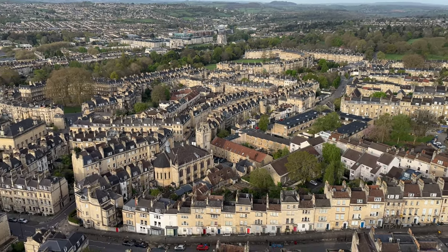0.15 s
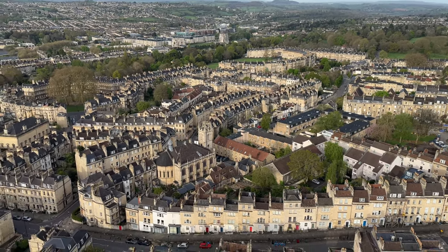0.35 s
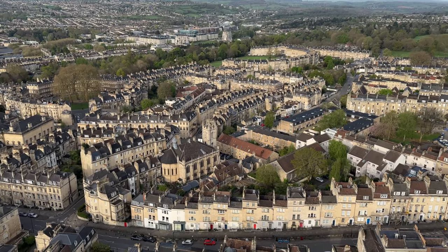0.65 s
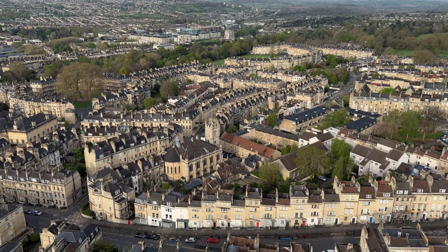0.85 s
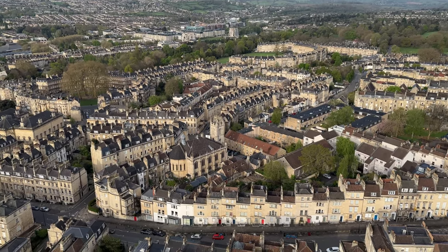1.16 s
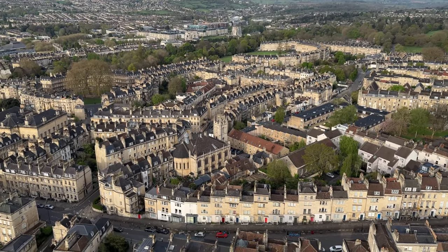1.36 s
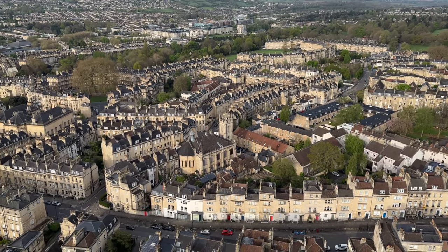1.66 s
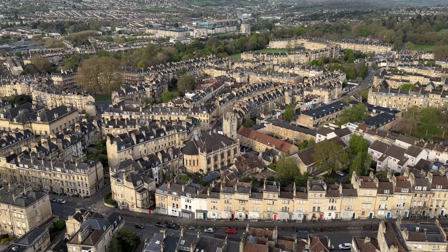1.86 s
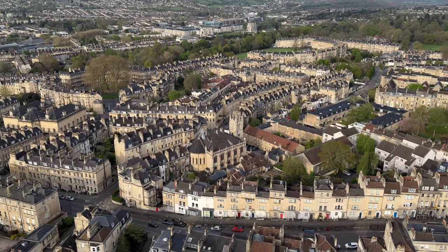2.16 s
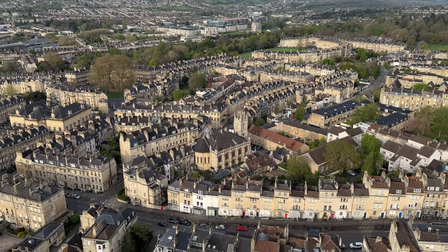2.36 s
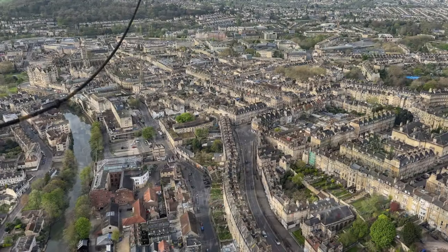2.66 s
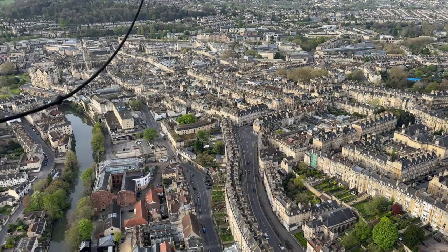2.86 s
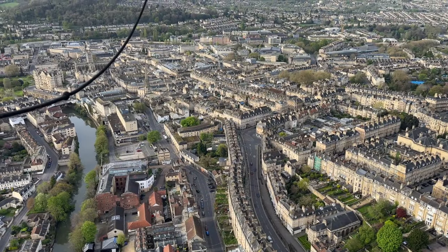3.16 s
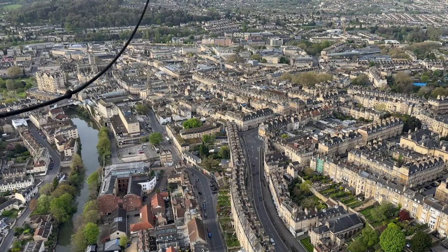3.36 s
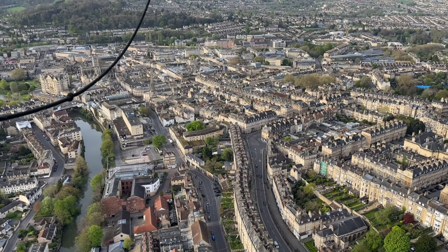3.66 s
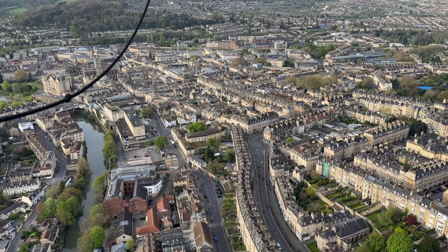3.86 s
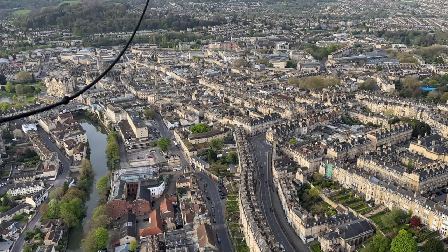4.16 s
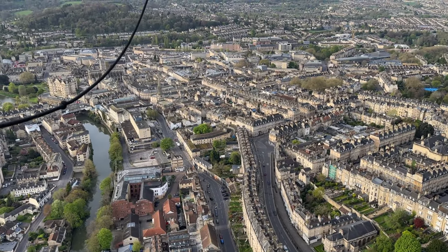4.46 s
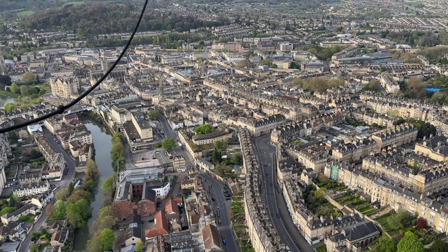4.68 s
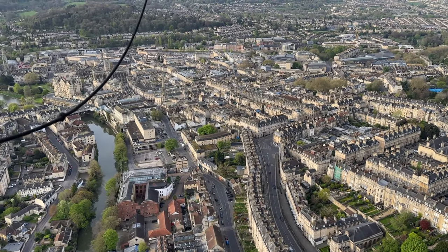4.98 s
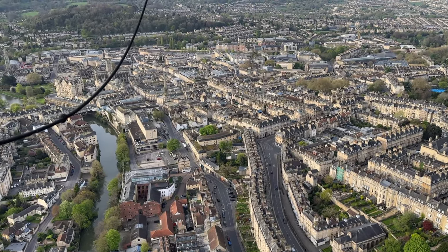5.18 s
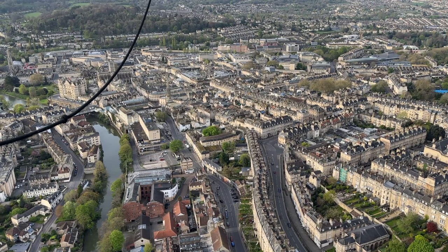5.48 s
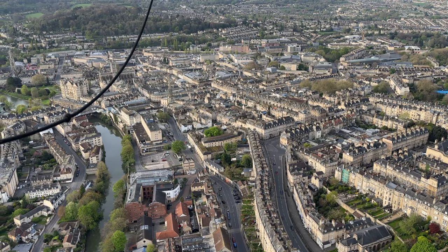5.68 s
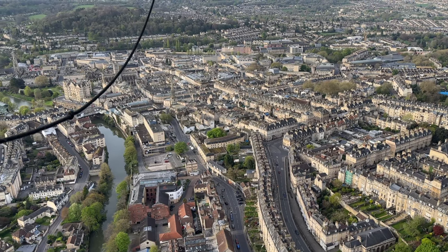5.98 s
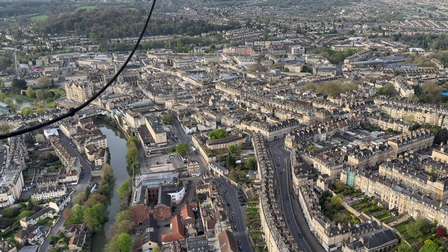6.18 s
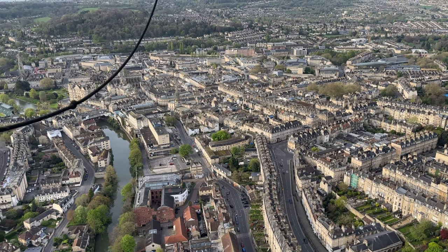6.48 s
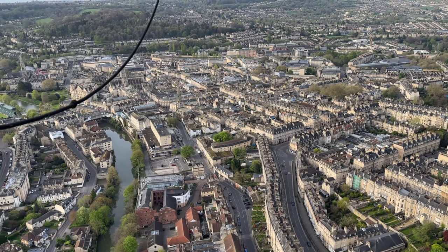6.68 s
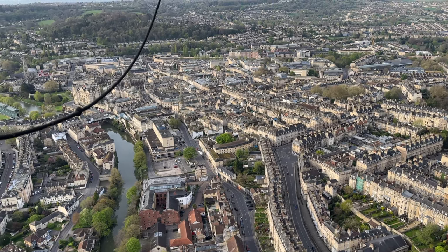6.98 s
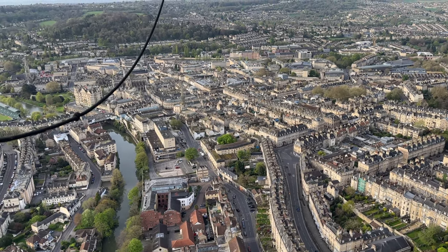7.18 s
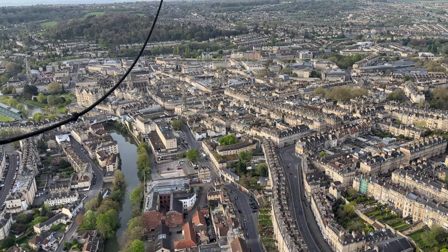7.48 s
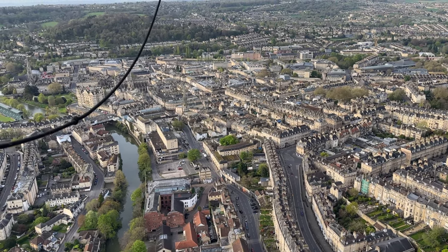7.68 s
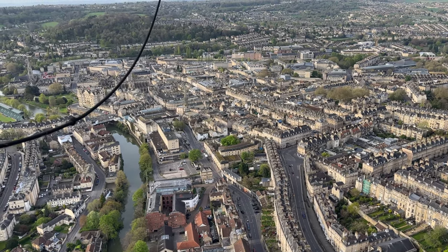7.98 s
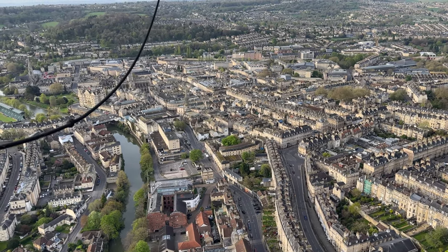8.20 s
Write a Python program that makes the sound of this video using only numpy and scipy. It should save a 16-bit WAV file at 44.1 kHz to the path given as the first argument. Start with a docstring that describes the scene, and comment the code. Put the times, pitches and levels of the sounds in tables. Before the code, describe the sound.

A loud gas flame rumbles and hisses just above the microphone, wide in stereo and completely dry. One long blast overlaps into another that begins with extra pressure and brighter jets, then eases slightly. After several seconds it collapses suddenly as the valve closes, its deepest rumble going last. Remaining gas whistles away with a bright ping. In the quiet are a distant wavering engine, faint falling birdlike chirps, dull traffic and a crackly creak of the basket.

```python
"""A rumbling, roaring gas flame and hissing jets: one long blast gives way to a second, brighter one.
The propane burner of a hot air balloon fires above the basket: filtered noise, with narrow resonances for the jets.
The valve shuts and the last gas bleeds away as fading noise, with short pings and ticks of decaying sines.
Left are a faint pilot hiss, a brief wicker creak of short noise slips, a few falling sine chirps,
and the far town: dull noise and one wavering engine tone."""
import sys
import numpy as np
from scipy import signal
from scipy.fft import rfft, irfft, next_fast_len
from scipy.io import wavfile
from scipy.ndimage import uniform_filter1d

SR = 44100
rng = np.random.default_rng(int(sys.argv[2]) if len(sys.argv) > 2 else 0)


def pcm_store(signal):
    """Save signal as 16-bit PCM."""
    levels = np.round(np.clip(np.atleast_2d(signal), -1, 1) * 32767)
    wavfile.write(sys.argv[1], SR, levels.astype(np.int16).T)


N = 367794
T = np.arange(N) / SR                                      # time [s]
HZ = np.maximum(np.arange(N // 2 + 1) * SR / N, 1)         # frequency of each spectral bin [Hz]


def from_db(db):
    """Decibels to gain."""
    return 10 ** (np.asarray(db) / 20)


def in_time(rows):
    """The columns of a time curve, interpolated at every sample."""
    s, *columns = np.transpose(rows)
    return [np.interp(T, s, column) for column in columns]


def in_frequency(rows):
    """The columns of a spectrum, interpolated over log frequency."""
    hz, *columns = np.transpose(rows)
    return [np.interp(np.log(HZ), np.log(hz), column) for column in columns]


def white():
    """The spectrum of a fresh white noise."""
    return rng.standard_normal(len(HZ)) + 1j * rng.standard_normal(len(HZ))


def below(edge_hz, order):
    """Gain of a low-pass."""
    return 1 / np.sqrt(1 + (HZ / edge_hz) ** (2 * order))


def above(edge_hz, order):
    """Gain of a high-pass."""
    return 1 / np.sqrt(1 + (edge_hz / HZ) ** (2 * order))


def sound(spectrum):
    """A stereo spectrum as a wave whose left-right mean has rms 1."""
    x = irfft(spectrum, N)
    return x / np.std(x.mean(axis=0))


def drift(rate_hz):
    """Low-passed random curve with spread 1, drawn at every tenth sample."""
    size = next_fast_len(N // 10 + 2)
    hz = np.arange(size // 2 + 1) * SR / 10 / size
    spectrum = rfft(rng.standard_normal(size)) / np.sqrt(1 + (hz / rate_hz) ** 4)
    x = irfft(spectrum, size)
    return np.interp(np.arange(N) / 10, np.arange(size), x / np.std(x))


def ear_noise(likeness):
    """Spectra of two white noises that are partly the same: likeness 0 is independent, 1 is identical."""
    alike = np.clip(likeness, 0, 1)
    common = np.sqrt((1 + alike) / 2) * white()
    opposed = np.sqrt((1 - alike) / 2) * white() * [[1], [-1]]
    return common + opposed


def at_ears(left_db, right_db, lead_rad):
    """Gain and phase on the way to each ear; the left leads."""
    return np.vstack([from_db(left_db) * np.exp(1j * lead_rad), from_db(right_db)])


def rush(colour, likeness):
    """Steady stereo noise of a given colour."""
    return sound(ear_noise(likeness) * from_db(in_frequency(colour)[0]))


def dying(start_s, db_per_s):
    """Level drop in dB from a given moment on."""
    return -db_per_s * np.maximum(T - start_s, 0)


def evened(x, window_s):
    """A noise with its slow swings of level taken out."""
    power = uniform_filter1d(x.mean(axis=0) ** 2, int(window_s * SR))
    return x / np.sqrt(power + 1e-12)


def hollow(x, hollows):
    """Narrow bands of the sound are weakened; a positive depth lifts the band instead."""
    change_db = 0
    for hz, half_width_hz, depth_db in hollows:
        change_db = change_db + depth_db * np.exp(-((HZ - hz) / half_width_hz) ** 4)
    return irfft(rfft(x) * from_db(change_db), N)


def town(traffic_db, octave_db, left_db):
    """Traffic murmurs far below as dull noise; one engine stands out, a wavering tone with its octave."""
    # murmur of traffic: (frequency [Hz], relative level [dB per Hz])
    traffic_colour = [(15, -49), (25, -35), (48, -2), (86, -6), (123, -10.5), (155, -10.5), (258, -14.5),
                      (439, -20.5), (1510, -24), (1710, -28), (2070, -31.5), (2450, -36), (2730, -34.5),
                      (4000, -52), (5200, -77), (8800, -120)]
    # far engine: (time [s], pitch [Hz], level [dB])
    engine_curve = [(7.0, 114, -47), (7.3, 114.4, -38.5), (7.45, 119.3, -50.5), (7.8, 124.7, -44),
                    (8.05, 121.8, -51.5), (8.34, 130.7, -49)]
    traffic = from_db(traffic_db) * rush(traffic_colour, likeness=0.78 * below(390, order=1))
    pitch_hz, engine_db = in_time(engine_curve)
    phase = 2 * np.pi * np.cumsum(pitch_hz * (1 + 0.0251 * drift(10))) / SR
    tone = np.sin(phase) + from_db(octave_db) * np.sin(2 * phase)
    engine = np.sqrt(2) * from_db(engine_db + 1.7 * drift(7.7)) * tone
    return (traffic + engine) * from_db([[left_db], [-left_db]])


def chirps(top_hz, bottom_hz, fall_s, length_s, rough, blur_hz):
    """Faint falling chirps, like a bird far below: sines gliding down, blurred in pitch by the distance."""
    # chirps: (time [s], level [dB])
    calls = [(7.16, -75), (7.31, -76.5), (7.375, -74), (7.46, -73), (7.625, -73.5)]
    wobble_cycles = np.cumsum(blur_hz * drift(250)) / SR
    out = 0
    for s, db in calls:
        age_s = np.clip(T - s, 0, length_s)
        swell = np.sin(np.pi * age_s / length_s)
        glide_cycles = bottom_hz * age_s - (top_hz - bottom_hz) * fall_s * np.exp(-age_s / fall_s)
        out = out + from_db(db) * swell * np.sin(2 * np.pi * (glide_cycles + wobble_cycles))
    return out * (1 + rough * drift(110))


def rustles(grain_db, split_hz):
    """The wicker creaks: each slip is a dull knock with a bright snap of noise, over a faint rubbing."""
    # slips and ticks in the basket: (time [s], dull knock [dB], bright snap [dB])
    slip_events = [(7.681, -63, -61), (7.6955, -60, -52), (7.701, -45, -56), (7.707, -52, -63),
                   (7.721, -54, -56), (7.7315, -58, -55), (7.738, -49, -58), (7.750, -56, -55),
                   (7.761, -51, -64), (8.034, -58, -55)]
    # colour of the wicker: (frequency [Hz], relative level [dB per Hz])
    wicker_colour = [(400, -5), (1900, 9), (2400, 6), (3200, -3), (4500, -4), (6200, 1), (8000, -7),
                     (10000, -9), (15000, -15)]
    slip_decay_s = 0.0019
    rub_middle_s, rub_half_length_s, rub_db = 7.728, 0.04, -63
    wicker = rfft(rush(wicker_colour, likeness=.4))
    dull = sound(wicker * below(split_hz, order=4))
    bright = sound(wicker * above(split_hz, order=4))
    slips = 0
    for s, knock_db, snap_db in slip_events:
        decay = (T >= s) * np.exp(-np.abs(T - s) / slip_decay_s)
        slips = slips + decay * (from_db(knock_db) * dull + from_db(snap_db) * bright)
    rub_swell = np.exp(-((T - rub_middle_s) / rub_half_length_s) ** 4)
    rubbing = from_db(rub_db + grain_db * drift(400)) * rub_swell
    return slips + rubbing * sound(wicker)


def pings_and_knocks():
    """Pings, knocks and ticks: short decaying sines; those at 7.70 s give the creak's knock its body."""
    # sines: (time [s], frequency [Hz], level at onset [dB], time to fall 60 dB [s])
    strikes = [(7.06, 5760, -49, .06), (7.25, 4950, -62, .06), (7.252, 4600, -63, .06),
               (7.7005, 1200, -43, .018), (7.701, 2380, -47, .028), (8.034, 5600, -61, .025)]
    out = 0
    for s, hz, db, t60_s in strikes:
        out = out + (T >= s) * from_db(db + dying(s, 60 / t60_s)) * np.sin(2 * np.pi * hz * (T - s))
    return out


def nozzle_ring(hz, half_width_hz, level_db):
    """The last gas makes a nozzle sing in a narrow band of noise, swelling and then tapering away."""
    peak_s, swell_db_per_s, taper_db_per_s = 7.085, 90, 245
    tone = sound(ear_noise(.3) / (1 + ((HZ - hz) / half_width_hz) ** 2))
    swell_db = swell_db_per_s * np.minimum(T - peak_s, 0)
    return tone * from_db(level_db + swell_db + dying(peak_s, taper_db_per_s))


def idle_burner(pilot_db):
    """The coil empties in a short puff, then a faint trickle; the pilot flame stays lit."""
    # colour of the bleeding gas: (frequency [Hz], relative level [dB per Hz])
    bleed_colour = [(2000, -6.5), (3650, -19), (4050, -5), (4250, -8), (4440, 0), (4700, -10), (4950, -3),
                    (5200, -17), (6600, -9), (7500, -19), (9000, -18), (12000, -33)]
    # singing nozzles: (frequency [Hz], half width [Hz], level [dB])
    rings = [(4415, 62, -58), (4950, 60, -63.5)]
    # faint hiss of the pilot flame: (frequency [Hz], relative level [dB per Hz])
    pilot_colour = [(2500, 0), (4000, -3), (5900, -5), (6300, 3), (6550, -1), (6850, 1), (7600, -21),
                    (8800, -1), (10500, -18), (13000, -12), (14400, -8), (15700, -16)]
    bleed_starts_s, bleed_attack_s = 6.92, 0.035
    puff = from_db(-53 + dying(7.06, db_per_s=220))
    trickle = from_db(-83 + dying(7.6, db_per_s=100))
    gas = (puff + trickle) * rush(bleed_colour, likeness=.3)
    gas = gas + sum(nozzle_ring(*ring) for ring in rings)
    bleed = np.clip((T - bleed_starts_s) / bleed_attack_s, 0, 1) * gas
    return bleed + from_db(pilot_db) * rush(pilot_colour, likeness=.15)


def flame(colour, split_hz, top_hz, echo_s, echo_db):
    """Turbulent burning: large eddies rumble, small ones roar; a dull reflection ripples the bass."""
    left_db, right_db, likeness, lead_rad = in_frequency(colour)
    burning = ear_noise(likeness) * at_ears(left_db, right_db, lead_rad)
    burning = burning * above(18, order=3) * below(top_hz, order=12)
    delay = np.exp(-2j * np.pi * HZ * echo_s)
    burning = burning * (1 + from_db(echo_db) * below(470, order=2) * delay)
    rumble = sound(burning * below(split_hz, order=4))
    roar = sound(burning * above(split_hz, order=4))
    return rumble, roar


def jets(hiss, peaks, lowest_hz):
    """Gas tears out of the nozzles: a broad hiss, and resonances that each reach the ears by their own path."""
    left_db, right_db, likeness = in_frequency(hiss)
    gas = ear_noise(likeness) * at_ears(left_db, right_db, 0)
    for hz, width_hz, peak_left_db, peak_right_db, lead_rad in peaks:
        resonance = 1 / (1 + 2 * ((HZ - hz) / width_hz) ** 2)
        gas = gas + white() * at_ears(peak_left_db, peak_right_db, lead_rad) * resonance
    return sound(gas * above(lowest_hz, order=30))


def swaying_echo(x, echo_s, echo_db, sway_s, sway_hz):
    """The frame reflects the hiss; its path shifts as the basket sways, so the colour wavers."""
    then_s = T - echo_s - sway_s * drift(sway_hz)
    return x + from_db(echo_db) * np.array([np.interp(then_s, T, ear) for ear in x])


def steady_burn(settled_db, opening_db):
    """Levels of rumble, roar and hiss: all follow the gas pressure, and the flame also surges."""
    # flame flares up (+) or falters (-): (time [s], rumble change [dB], roar change [dB], half length [s])
    surges = [(0.1, 2.5, 2, 0.048), (0.667, 5.5, 1.5, 0.038), (0.962, 2.5, 1.5, 0.052),
              (1.33, -4.5, -1, 0.076), (1.484, 5, 0.5, 0.019), (1.784, 0, 3, 0.032), (1.89, -5, -0.5, .05),
              (2.336, -13, -0.5, 0.02), (3.007, -1, 2.5, 0.027), (3.208, 0, 2.5, 0.027),
              (3.626, 5, 0.5, 0.035), (3.74, -7, -1, 0.03), (3.824, 5.5, 1.5, 0.034), (4.08, 2, -1, 0.037),
              (4.555, -2.5, -3, 0.04), (4.682, 3.5, -1, 0.034), (4.805, 2.5, 0.5, 0.041),
              (5.584, 6, 1.5, 0.02), (5.858, -4.5, 1.5, 0.034), (6.056, 3, 1, 0.081), (6.222, 6, 2, 0.014),
              (6.486, 4.5, 1, .05), (6.818, 2.5, 0, 0.074)]
    rumble_db, roar_db, jet_db = (np.full(N, float(db)) + opening_db for db in settled_db)
    for s, rumble_surge_db, roar_surge_db, half_length_s in surges:
        near = np.abs(T - s) < .5
        swell = np.exp(-((T[near] - s) / half_length_s) ** 2)
        rumble_db[near] += rumble_surge_db * swell
        roar_db[near] += roar_surge_db * swell
    return rumble_db, roar_db, jet_db


def blast(levels, colour, hiss, peaks, hollows, flutter_db, billow_db, sputter_db):
    """One burn. As the valve closes the jets sag and stop, then the roar, and the biggest eddies burn out last."""
    rumble_db, roar_db, jet_db = levels
    flutter = flutter_db * drift(11.6)      # uneven fuel flow moves flame and jets together
    billow = billow_db * drift(15.0)        # the whole flame swells and shrinks
    sputter = sputter_db * drift(250)       # boiling propane roughens the jets
    crackle = 0.72 * drift(95)              # pockets of gas flare up
    jet_sag_db = dying(6.897, db_per_s=165)
    jet_stop_db = dying(6.948, db_per_s=720)

    rumble, roar = flame(colour, split_hz=196.7, top_hz=2980, echo_s=0.00833, echo_db=-18.5)
    rumble = evened(rumble, window_s=.17) * from_db(rumble_db)
    roar = roar * from_db(roar_db + crackle + jet_sag_db / 2)
    fire = from_db(billow) * (rumble + roar)
    deepest = irfft(rfft(fire) * below(100, order=4), N)
    upper = fire - deepest
    fire = deepest * from_db(dying(6.975, db_per_s=230)) + upper * from_db(dying(6.945, db_per_s=240))

    gas = jets(hiss, peaks, lowest_hz=2693)
    gas = swaying_echo(gas, echo_s=.003, echo_db=-9.0, sway_s=0.000161, sway_hz=1.41)
    gas = gas * from_db(jet_db + sputter + jet_sag_db + jet_stop_db)
    return hollow(from_db(flutter) * (fire + gas), hollows)


def burner():
    """The first blast has long settled; the second opens at once with extra pressure that ebbs, as the first fades."""
    # flames: (frequency [Hz], left [dB per Hz], right [dB per Hz], left-right likeness [0-1], left lead [rad])
    first_flame, second_flame = [(22.0, -35, -37.5, 0.82, 0.07), (48, 0.5, -1, 0.96, 0.26),
                                 (63.5, 3.5, 1, 1, -0.3), (152.5, -2.5, -6, 0.98, -0.12),
                                 (229, -10, -13, 1, -0.014), (346, -8, -15.5, 1, 0.2),
                                 (392, -15.5, -16.5, 0.8, -0.067), (498, -14, -18, 0.93, 0.26),
                                 (750.0, -17, -16.5, 0.97, -0.44), (925, -17.5, -16, 0.99, 0.0017),
                                 (1600, -20, -21, 0.99, -0.17), (2030, -32, -31.5, 0.37, 0.61),
                                 (2530, -37, -39, 0.1, 0.34), (3200.0, -55, -52, 0.55, -0.36)], [(22.0, -40, -34, 0.94, 0.1),
                                                      (46.6, -2, -2, 0.92, 0.21), (63, 4.5, 2, 1, 0.16),
                                                      (140, -2, -5, 0.97, 0.13),
                                                      (242, -7.5, -10, 0.88, 0.27),
                                                      (350, -11, -13.5, 1, 0.64),
                                                      (433, -9, -17.09, 0.92, 1), (508, -12, -15, 1, 0.76),
                                                      (765, -12.5, -20.5, 0.97, 1.1),
                                                      (1016, -17.5, -20, 0.6, 0.33),
                                                      (1560, -22.5, -22.5, 1.0, 1.89),
                                                      (2190, -26.5, -29.5, 0.36, 2.85),
                                                      (2360, -33, -30.5, 0.92, 3.2),
                                                      (3200.0, -53, -52, 0.96, 3.9)]
    # broad hiss of the jets: (frequency [Hz], left [dB per Hz], right [dB per Hz], left-right likeness [0-1])
    first_hiss, second_hiss = [(2780, -14.5, -14.5, 0.1), (3600, -14.5, -19, 0), (6000, -18, -25, 0),
                               (9150, -24, -14, 0.1), (11200, -25, -25.5, 1), (13300, -31, -30, 1),
                               (14500, -27, -28, 0.1), (16000, -32, -32, .1)], [(2760, -11, -11, 0.4), (3320, -17.5, -15.5, 0.46),
                                                   (6000, -14.5, -19.5, 0), (9440, -14, -18, 0.33),
                                                   (11200, -24.5, -24, 1), (13300, -22.5, -23.5, 1),
                                                   (14500, -21.5, -22, 0), (16000, -22, -18, 0)]
    # resonances in the hiss: (frequency [Hz], width [Hz], left [dB], right [dB], left lead [rad])
    first_peaks, second_peaks = [(2920, 1000, -13, -13.5, 3.5), (4090, 230, -2.5, -19, -2.5),
                                 (4620, 270, -13, -14, 1.5), (5080, 310, -4, -21, -1.5),
                                 (5390, 150, -2, -15, -0.5), (5650, 130, -1, -20, 1),
                                 (5965, 190, 1, -20, 1.4), (6550, 320, -6.5, -12, 1.8),
                                 (7160, 250, 0.0, -25, 0.5), (8020, 210, -15, -14, -4.5),
                                 (8440, 150, -7, -20, 1.3), (8830, 280, -8, -22, 2.5),
                                 (10000, 300, -17, -18, 4)], [(2790, 78, -4, -2, -1.8), (3982, 280, -0.5, -7, 0.92),
                                                      (4505, 165, -1.5, -9, 0), (4934, 210, -0.5, -9, 1.7),
                                                      (5410, 140, -3.5, -23, 3.5),
                                                      (5850, 200, -9.5, -25, -0.5),
                                                      (6150, 134, -1.5, -28, 0.8),
                                                      (6590, 240, -2, -28, -0.8), (6790, 190, -2, -31, 1.5),
                                                      (7165, 150, -2, -25, 0.5), (7900, 250, -12, -31, 5),
                                                      (8500, 130, -6, -14, -1.5),
                                                      (8600, 380, -13, -17, -4.5),
                                                      (9960, 520, -28, -14, 1.8)]
    # hollows in the colour of each blast: (frequency [Hz], half width [Hz], depth [dB])
    first_hollows, second_hollows = [(2510, 130, -6), (2800, 31, -5), (2990, 45, -8), (3480, 78, -7),
                                     (5480, 55, -2), (7470, 130, -6.5)], [(2485, 150, -20), (3370, 120, -1.5),
                                                            (4180, 55, -8), (5170, 70, -3), (7670, 60, 1),
                                                            (9600, 110, -3)]
    # settled levels: (flame rumble [dB], flame roar [dB], jet hiss [dB])
    first_db, second_db = (-21, -23, -33.5), (-20.5, -23, -32)
    second_starts_s, attack_s = 2.42, 0.0025
    first_fades_s, first_gone_s = 2.75, 2.87
    extra_db, ebb_s = 3.5, 1.38      # the valve opens on a full coil

    opening_db = extra_db * np.exp(-np.maximum(T - second_starts_s, 0) / ebb_s)
    first = blast(steady_burn(first_db, 0), first_flame, first_hiss, first_peaks, first_hollows,
                  flutter_db=0.6, billow_db=.5, sputter_db=0.5)
    second = blast(steady_burn(second_db, opening_db), second_flame, second_hiss, second_peaks, second_hollows,
                   flutter_db=.5, billow_db=0.56, sputter_db=0.5)
    fade_out = np.interp(T, [first_fades_s, first_gone_s], [1, 0])
    fade_in = np.clip((T - second_starts_s) / attack_s, 0, 1)
    return first * fade_out + second * fade_in


def shimmer(x, depth_db, full_hz, patch_hz, patch_s):
    """Hot air wanders on the way: at each ear narrow bands swell and fade on their own, the treble most."""
    hz, s, frames = signal.stft(x, SR, nperseg=1024)
    across = np.fft.fftfreq(len(hz), hz[1])[:, None]
    along = np.fft.rfftfreq(len(s), s[1])
    smooth = np.exp(-(np.pi * patch_hz * across) ** 2 - (np.pi * patch_s * along) ** 2)
    chance = np.fft.rfft2(rng.standard_normal(frames.shape))
    patches = np.fft.irfft2(chance * smooth, frames.shape[1:])
    depth_by_hz = depth_db * np.sqrt(np.minimum(hz / full_hz, 1))[:, None]
    swing_db = depth_by_hz * patches / np.std(patches)
    return signal.istft(frames * from_db(swing_db), SR)[1][:, :N]


def scene():
    """Open air, without reverberation: the burner over the quiet sounds of basket and town."""
    # hollows in the quiet sounds: (frequency [Hz], half width [Hz], depth [dB])
    quiet_hollows = [(2540, 110, -2), (7600, 130, -5)]
    far = town(traffic_db=-44, octave_db=-14, left_db=1.2)
    far = far + chirps(top_hz=5250, bottom_hz=4580, fall_s=.025, length_s=.06, rough=.6, blur_hz=110)
    basket = rustles(grain_db=1.0, split_hz=3100) + pings_and_knocks()
    quiet = far + basket + idle_burner(pilot_db=-67.5)
    burning = shimmer(burner(), depth_db=1.5, full_hz=8600, patch_hz=95, patch_s=0.23)
    return burning + hollow(quiet, quiet_hollows)


def record(dry):
    """The very highest peaks are rounded, and the top is cut steeply."""
    ceiling, cutoff_hz = .95, 15750
    rounded = dry / (1 + (dry / ceiling) ** 10) ** (1 / 10)
    steep_cut = signal.ellip(12, .1, 70, cutoff_hz, fs=SR, output="sos")
    return signal.sosfilt(steep_cut, rounded)


dry = scene()
out = record(dry)
pcm_store(out)
```